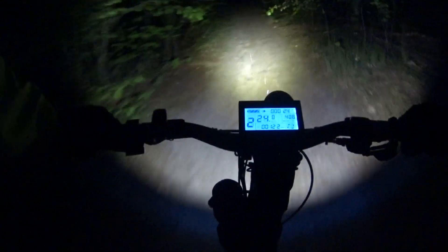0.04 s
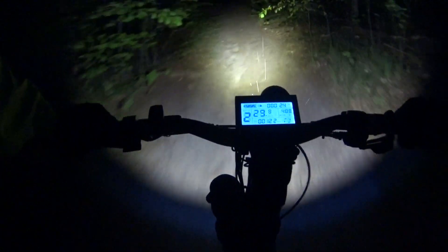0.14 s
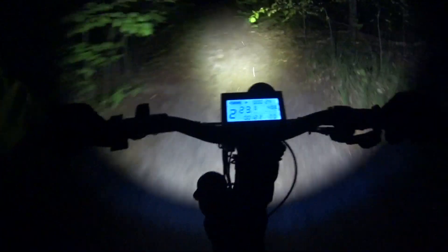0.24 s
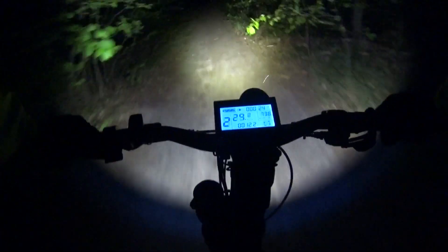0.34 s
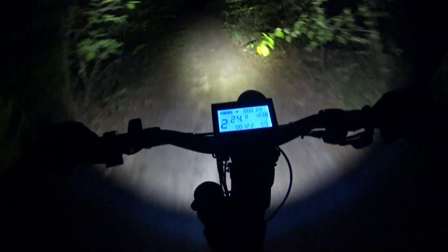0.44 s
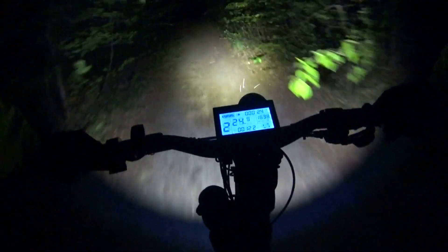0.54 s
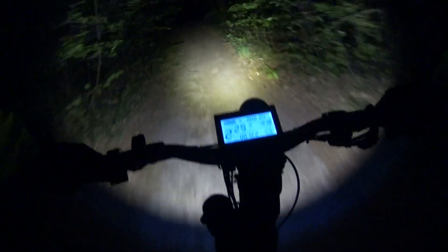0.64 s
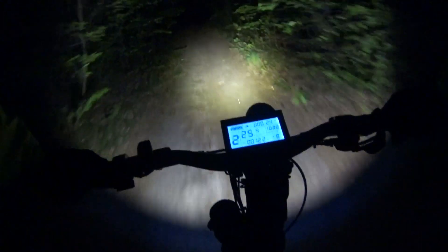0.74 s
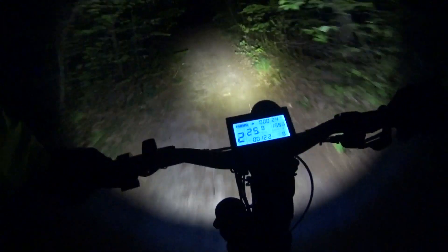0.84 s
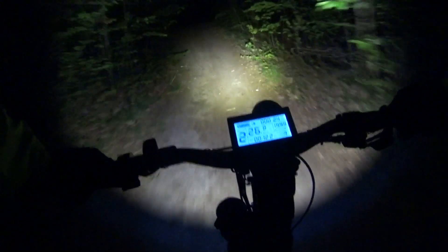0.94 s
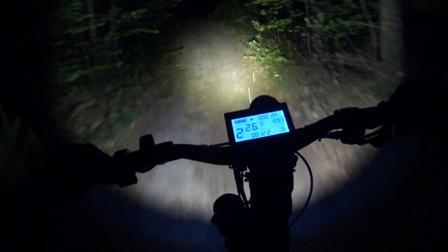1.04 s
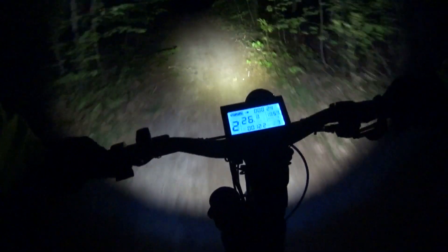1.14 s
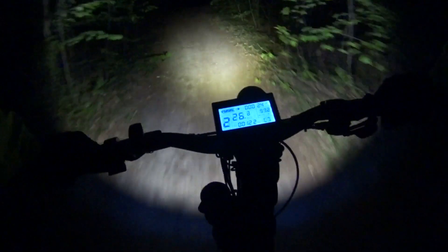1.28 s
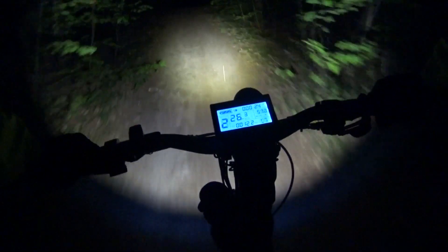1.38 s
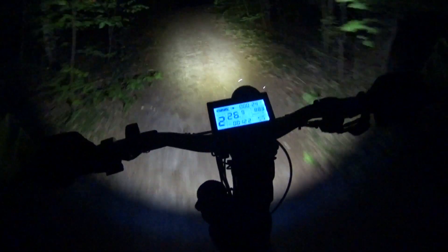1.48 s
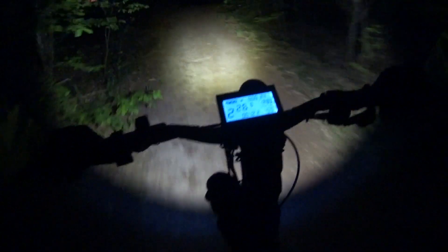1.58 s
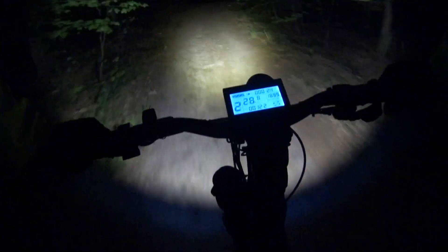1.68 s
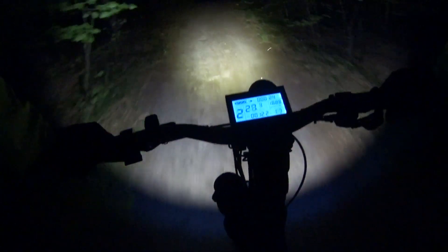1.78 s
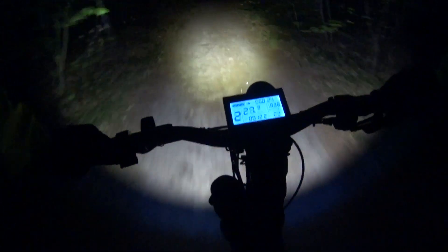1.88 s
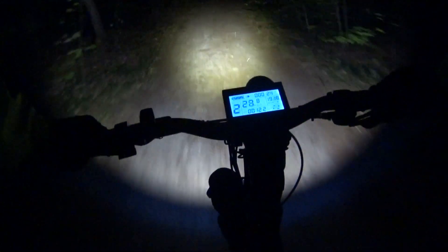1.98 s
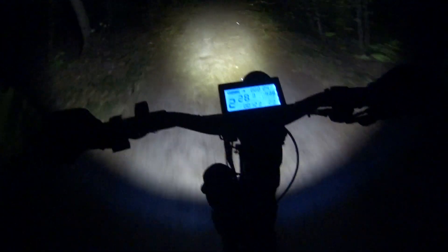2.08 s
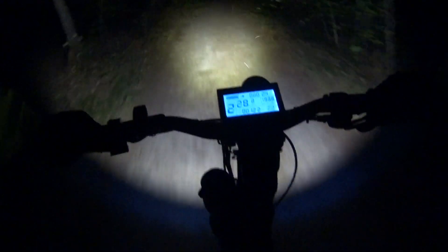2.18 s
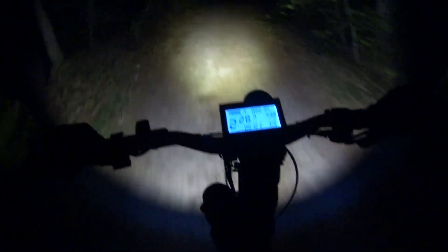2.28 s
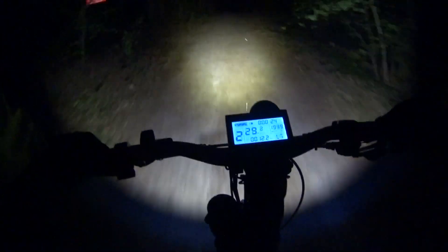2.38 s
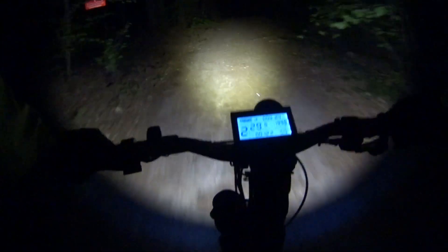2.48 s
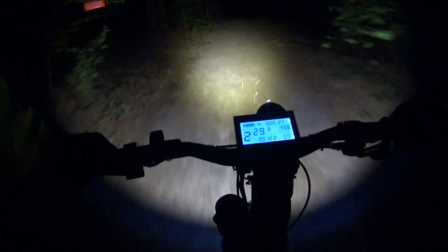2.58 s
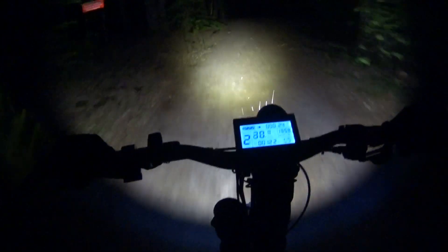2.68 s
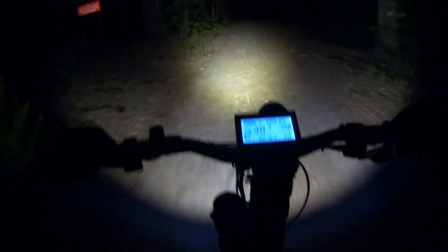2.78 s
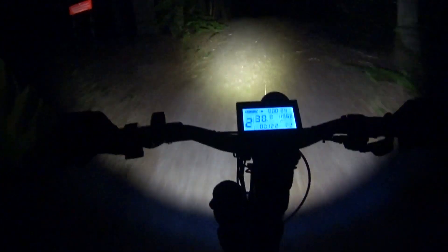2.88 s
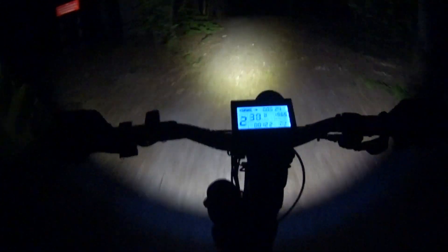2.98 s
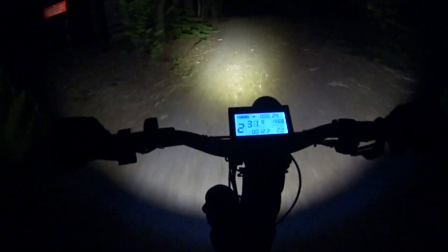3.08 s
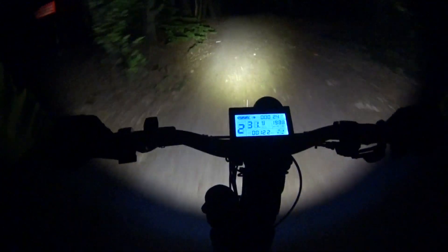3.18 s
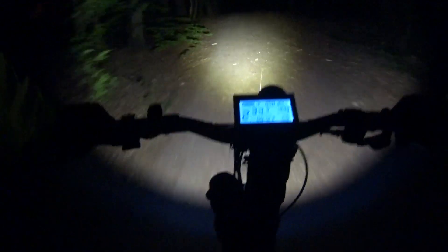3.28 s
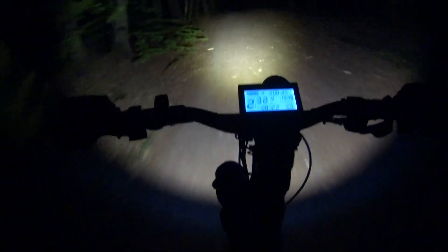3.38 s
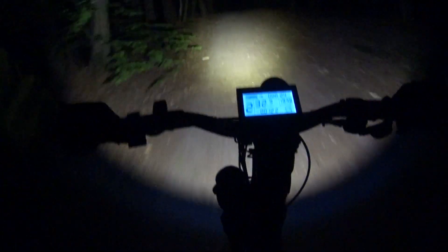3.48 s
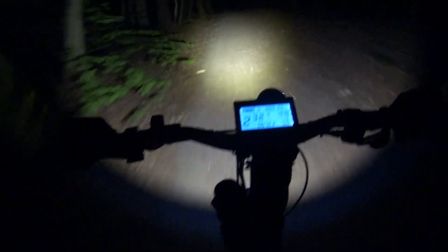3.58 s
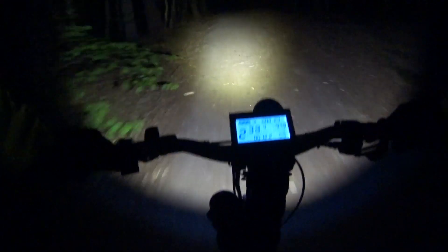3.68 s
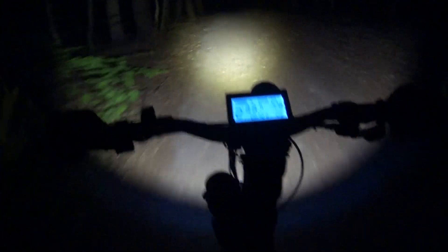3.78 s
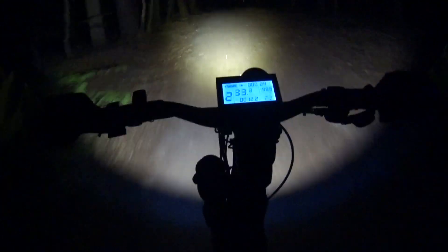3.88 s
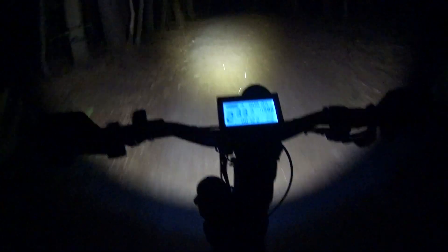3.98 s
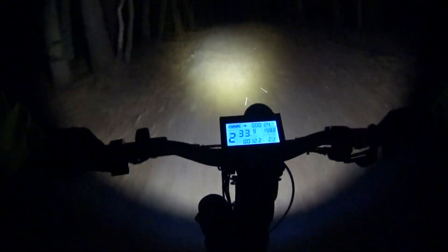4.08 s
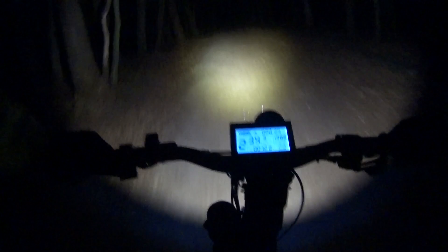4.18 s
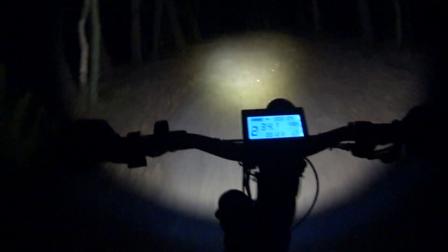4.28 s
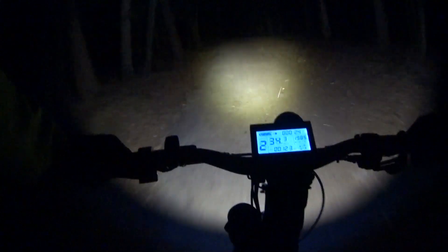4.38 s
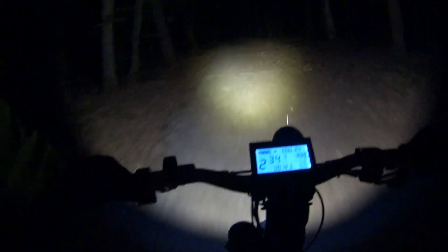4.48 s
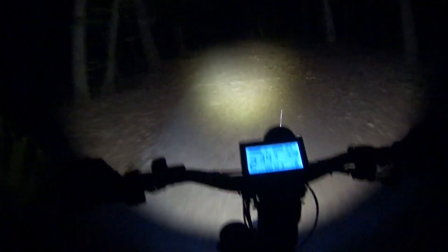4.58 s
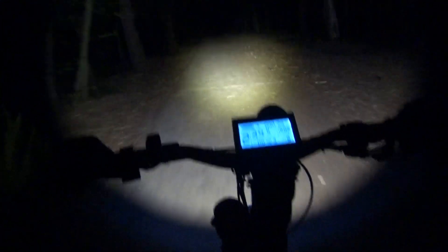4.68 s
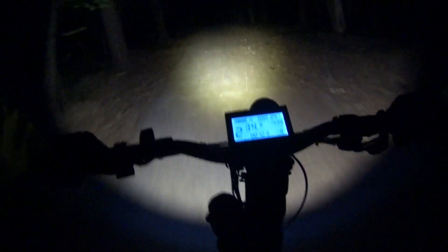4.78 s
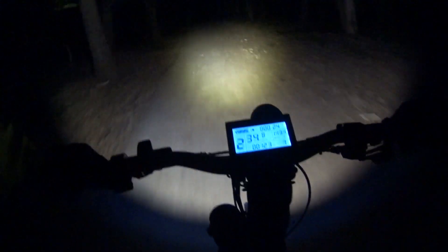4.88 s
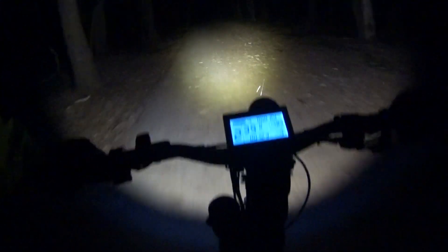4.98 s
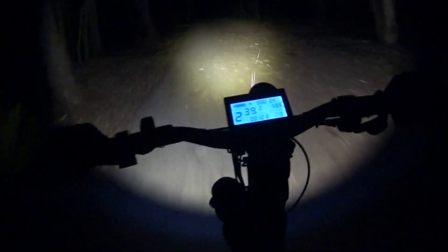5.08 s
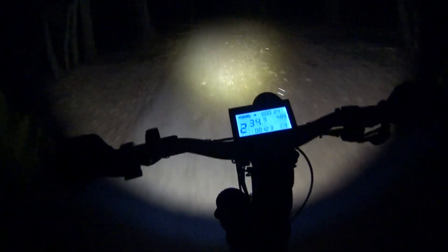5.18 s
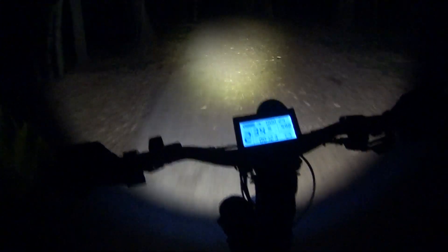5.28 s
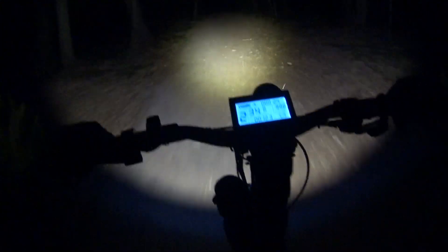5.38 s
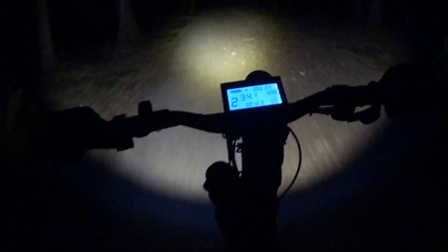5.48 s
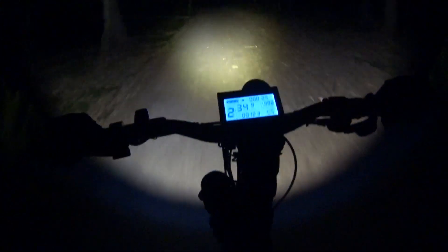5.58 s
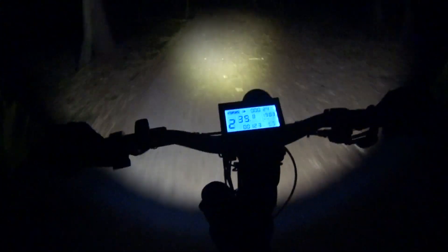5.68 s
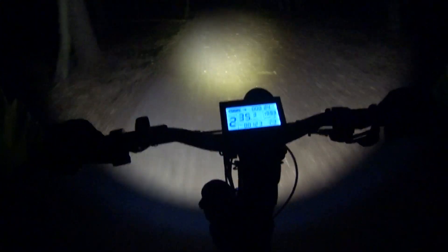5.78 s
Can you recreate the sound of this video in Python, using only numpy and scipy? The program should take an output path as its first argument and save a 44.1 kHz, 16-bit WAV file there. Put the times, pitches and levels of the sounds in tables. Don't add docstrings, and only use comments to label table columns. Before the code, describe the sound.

Continuous gritty tyre noise, midrange-heavy with little deep bass, grows in uneven surges as the bike gains speed. Brief sprays of litter hiss or roar through it. Short, dry stone knocks and brighter twig snaps break out irregularly, joined by tiny high metal pings and rattles. The close on-bike microphone gives a boxy, slightly resonant two-channel sound, dry and without audible forest echo.

```python
import sys
import numpy as np
from scipy import signal
from scipy.fft import rfft, irfft, next_fast_len
from scipy.io import wavfile
from scipy.ndimage import uniform_filter1d

SR = 44100
rng = np.random.default_rng(int(sys.argv[2]) if len(sys.argv) > 2 else 0)


def output_pcm(signal):
    pcm = np.clip(np.atleast_2d(signal).T, -1, 1) * 32767
    wavfile.write(sys.argv[1], SR, np.round(pcm).astype(np.int16))


def boost(x):
    u = np.asarray(x, float) / 20
    return 10 ** u


N = 257544

# start_s, load_db, coarseness_db
RIDE = [(0.0, -38, 2.5), (0.57, -37.5, 1), (0.78, -34.5, -0.5), (0.8, -36.5, -0.5), (1.9, -33, 0),
        (2.15, -27.5, 1.5), (2.65, -29, -0.5), (2.67, -27, 1), (2.7, -29, -2), (2.94, -25, 1.5),
        (3.55, -27.5, 0.5), (4.0, -23, 2), (4.21, -24.5, 0.5), (4.88, -22, 0.5), (4.93, -25, 3.5),
        (5.19, -24, -0.5), (5.32, -24.5, 0.5), (5.84, -23, 3.5)]
# centre_s, half_length_s, hiss_rise_db, roar_rise_db
SPRAYS = [(0.12, 0.025, -2, 9), (0.77, 0.022, 12, 1.5), (1.257, 0.041, 2.5, 5), (1.442, 0.021, 12, -7),
          (2.22, 0.067, 1.5, 3.5), (2.382, 0.035, 9.5, -2.5), (2.568, 0.0067, 1.5, 10),
          (2.67, 0.015, 14, 0), (3.486, 0.011, 3, 2.5), (4.224, 0.1, 4, 0.1), (4.43, 0.14, 2, -0.9),
          (4.85, 0.049, 6, 2.5), (5.204, 0.045, 5, 0), (5.467, 0.038, 5.5, 1), (1.115, 0.032, 7, 2),
          (2.294, 0.071, 4, 0), (3.59, .04, 6, 1), (3.991, 0.068, 2, 1), (5.68, 0.11, 4, 3),
          (5.342, 0.034, -2, -2), (1.637, .02, 3, 2.5), (2.723, .03, -2.5, -1.5)]
# start_s, peak_db, pitch_hz
KNOCKS = [(0.1017, -26, 2280), (0.501, -31.5, 1440), (0.7096, -24, 1480), (0.751, -21.5, 1900),
          (0.805, -27, 1460), (0.8976, -22, 1660), (0.989, -26, 2230), (1.1174, -21.5, 1700),
          (1.1444, -25.5, 1670), (1.4398, -20, 2300), (1.501, -30, 1650), (1.631, -22, 2420),
          (1.6829, -18, 1560), (1.8452, -20.5, 1450), (1.947, -12, 2400), (2.0024, -23, 1770),
          (2.427, -18, 1390), (2.5506, -13, 2200), (2.6642, -12.5, 1380), (3.146, -15, 2190),
          (3.242, -13, 1780), (3.3986, -12, 1730), (3.4248, -17.5, 2110), (3.5, -15, 1800),
          (4.1244, -11.5, 2380), (4.3385, -10.5, 2030), (5.127, -6.5, 2280), (5.2195, -11, 2140),
          (5.2493, -29, 1850), (5.6694, -10.5, 2520)]
# start_s, peak_db, pitch_hz, top_over_peak_db
TICKS = [(0.266, -36, 4470, -22), (0.765, -24, 4500, -26), (0.976, -24.5, 5000, -27),
         (1.119, -32, 4100, -24), (1.2155, -33, 4180, -28), (1.307, -38, 5170, -24), (1.44, -41, 4200, -24),
         (1.63, -30, 3600, -35), (1.666, -30, 4310, -19), (1.803, -31, 4220, -31),
         (1.867, -38.5, 4090, -11), (2.1823, -16, 4600, -21.5), (2.2214, -25.5, 4120, -28),
         (2.3406, -28, 3850, -27), (2.377, -17.5, 4500, -11.5), (2.619, -28.5, 4460, -20),
         (2.661, -30, 4600, -34), (3.0087, -20, 4200, -43), (3.1437, -28, 4300, -42),
         (2.397, -19.5, 5000, -26), (4.127, -23, 4200, -43), (4.187, -26.5, 4290, -22),
         (4.237, -16.5, 4500, -19), (4.3725, -23, 4300, -14), (4.655, -13.5, 4250, -30),
         (5.091, -27, 3760, -17), (5.149, -25.5, 4370, -33), (4.46, -31, 4380, -23),
         (5.465, -19, 3920, -25), (5.6745, -23, 4550, -41)]
# start_s, peak_db
PINGS = [
    (1.1273, -42),
    (1.4491, -41),
    (1.6776, -36),
    (2.3351, -31),
    (2.4159, -33),
    (2.5556, -34),
    (3.7499, -39),
    (5.467, -44),
    (5.5972, -37),
]
# start_s, length_s, level_db
CHATTER_SPELLS = [(1.445, .04, -58), (1.618, 0.02, -53), (1.668, .04, -52), (2.218, .01, -45),
                  (2.33, 0.031, -47), (2.392, 0.053, -50), (2.48, 0.011, -45), (2.548, .012, -63),
                  (2.613, 0.044, -51), (3.694, 0.017, -51), (4.273, .013, -46), (4.38, 0.053, -51),
                  (4.457, .016, -57), (4.482, .012, -54), (4.57, 0.018, -54), (4.74, .045, -59),
                  (4.84, .025, -64), (5.122, .025, -56), (5.23, .022, -56), (5.465, .04, -51)]
# freq_hz, density_db_per_hz
COLOUR = [(25, -15.5), (70, -21), (200, -17), (320, -14), (450, -17), (800, -7.5), (1400, 0), (2200, -3),
          (2600, 2.5), (3500, -12), (4300, -17.5), (5300, -24), (7200, -33), (11000, -46.5)]
# centre_hz, width_hz, gain_db
CASE_MODES = [(328, 100, 3.5), (501, 28, 4.5), (1390, 115, 3.5), (1675, 240, 6), (2200, 306, 10.5),
              (4300, 570, 4.5), (5860, 550, 2.5)]
# freq_hz, likeness_0_to_1, right_lead_rad, left_minus_right_db
PORTS = [(30, 0.88, 0.2, -0.3), (330, 0.91, 0.5, -1.7), (580, 0.57, 1.7, 0.0), (1400, 0.82, 1.2, 0.1),
         (1800, 0.63, 1.4, 2.1), (2100, 0.8, 2.1, 3.1), (2400, 0.28, 3.5, -0.0), (2700, 0.46, 4.6, -1.0),
         (3400, 0.17, 5.7, -3.8), (4200, 0.81, 6.5, -2.5), (5350, 0.23, 6.7, -1.6), (5900, 0.58, 6.6, -1.2),
         (6800, 0.31, 6.5, -1.1), (8500, 0.7, 6.3, -0.4)]

FFT_SIZE = next_fast_len(N + 8192)
GRID_HZ = np.maximum(np.fft.rfftfreq(FFT_SIZE, 1 / SR), 1)
FULL_LOAD_DB = -23


def rms_one(x):
    return x / np.sqrt(np.mean(x ** 2) + 1e-20)


def at_hz(points):
    hz, *columns = np.transpose(points)
    return [np.interp(np.log(GRID_HZ), np.log(hz), column) for column in columns]


def drift(rate_hz):
    pole = np.exp(-80 * np.pi * rate_hz / SR)
    noise = rng.standard_normal(N // 40 + 2002)
    slow = signal.lfilter([1], [1, -2 * pole, pole * pole], noise)[2000:]
    return np.interp(np.arange(N) / 40, np.arange(len(slow)), rms_one(slow))


def swell(level_db):
    return level_db - 10 * np.log10(np.mean(boost(2 * level_db)))


def causal(gain_db):
    cepstrum = irfft(gain_db * np.log(10) / 20, FFT_SIZE)
    cepstrum[1:FFT_SIZE // 2] *= 2
    cepstrum[FFT_SIZE // 2 + 1:] = 0
    return np.exp(rfft(cepstrum))


def to_ports(shared, own_left, own_right, least_likeness=0.):
    likeness, lead_rad, balance_db = at_hz(PORTS)
    lead_rad = np.where(GRID_HZ > 7000, 2 * np.pi, lead_rad)
    likeness = np.clip(likeness, least_likeness, 1)
    common, own = np.sqrt(likeness), np.sqrt(1 - likeness)
    left = common * shared * np.exp(-1j * lead_rad) + own * own_left
    right = common * shared + own * own_right
    return irfft([left * boost(balance_db / 2), right * boost(-balance_db / 2)], FFT_SIZE)[:, :N]


def ride():
    t_s = np.arange(N) / SR
    start_s, load_db, coarse_db = np.transpose(RIDE)
    spray_hiss_db, spray_roar_db = np.zeros(N), np.zeros(N)
    for centre_s, half_length_s, hiss_db, roar_db in SPRAYS:
        shape = np.clip(1 - np.abs(t_s - centre_s) / half_length_s, 0, 1)
        spray_hiss_db += hiss_db * shape
        spray_roar_db += roar_db * shape
    return np.interp(t_s, start_s, load_db), np.interp(t_s, start_s, coarse_db), spray_hiss_db, spray_roar_db


def tyres(grains_per_s, spread_db, bed_power, patchy_db, spill_bands):
    load, coarse, spray_hiss, spray_roar = ride()
    swells_db = np.array([
        swell(.56 * load),
        swell(load - .5 * coarse + spray_roar),
        swell(1.48 * load + .5 * coarse + .5 * spray_roar + .1 * spray_hiss),
        swell(.38 * load + .9 * coarse + spray_hiss)])
    bed = bed_power * boost(.35 * (load - FULL_LOAD_DB))

    sizes = boost(spread_db * np.minimum(rng.exponential(1, N), 3))
    sizes *= rng.random(N) < grains_per_s * boost(3 * drift(60)) / SR
    clicks = sizes * rng.standard_normal((3, N))

    centres_hz = np.array([40, 160, 400, 800, 1200, 1600, 2100, 2800, 3900, 5500, 7500, 10000])
    pitch_band = rng.uniform(2.26, len(centres_hz), N)
    together = drift(21)
    spectra = 0
    for k, hz in enumerate(centres_hz):
        grains = rms_one(clicks * np.exp(-((pitch_band - k) / spill_bands) ** 2))
        grit = np.interp(np.log(hz), np.log([600, 1300, 2800, 4500, 8000]), [.017, .2, .66, .16, .2])
        mix = np.array([np.interp(np.log(hz), np.log([450, 1400, 2500, 5000]), row) for row in np.eye(4)])
        level = boost(mix @ swells_db + patchy_db * (hz > 700) * (together + drift(5.9)))
        rush = np.sqrt(bed) * rng.standard_normal((3, N))
        drive = level * (rush + np.sqrt(grit) * grains) / np.sqrt(bed + grit)
        share = np.interp(np.log(GRID_HZ), np.log(centres_hz), np.arange(len(centres_hz)) == k)
        spectra = spectra + np.sqrt(share) * rfft(drive, FFT_SIZE)

    colour_db = at_hz(COLOUR)[0]
    for hz, width_hz, gain_db in CASE_MODES:
        colour_db = colour_db + gain_db / (1 + (2 * (GRID_HZ - hz) / width_hz) ** 2)
    return boost(-16) * to_ports(*(spectra * causal(colour_db)))


def ring(clicks, hz, t60_s):
    pole, turn_rad = boost(-60 / (t60_s * SR)), 2 * np.pi * hz / SR
    return signal.lfilter([0, np.sin(turn_rad)], [1, -2 * pole * np.cos(turn_rad), pole * pole], clicks + 1e-18)


def band(x, low_hz, high_hz):
    return signal.sosfilt(signal.butter(2, [low_hz, high_hz], "band", fs=SR, output="sos"), x)


def bursts(start_s, decay_ms, chatter_db):
    t_s = np.arange(1300) / SR
    rows = rng.standard_normal((len(start_s), len(t_s))) * np.exp(-t_s / (decay_ms / 1000))
    rows *= boost(chatter_db)
    rows[:, 0] = 1
    return rows, np.round(np.asarray(start_s) * SR).astype(int)


def laid_out(rows, starts, peak_db):
    out = np.zeros(N + rows.shape[1])
    for row, start, db in zip(rows, starts, peak_db):
        out[start:start + len(row)] += boost(db) * row / np.abs(row).max()
    return out[:N]


def contact_to_ports(x):
    smear = rng.standard_normal((2, 200)) * np.exp(-np.arange(200) / 35)
    smear /= np.sqrt(np.sum(smear ** 2, axis=1, keepdims=True))
    shared = rfft(x, FFT_SIZE)
    own_left, own_right = shared * rfft(smear, FFT_SIZE)
    return to_ports(shared, own_left, own_right, least_likeness=.85)


def pebbles(count):
    when, which, detune, size = rng.random((count, 4)).T
    start_s = (np.arange(count) + when) / count * (N / SR - .05)
    pitch_hz = np.array(CASE_MODES)[2 + (3 * which).astype(int), 0] * (.97 + .1 * detune)
    load_db = np.interp(start_s, *np.transpose(RIDE)[:2])
    over_load_db = 4 + 1.5 * (4 * size - 2)
    peak_db = FULL_LOAD_DB + .9 * (load_db - FULL_LOAD_DB) + over_load_db
    return list(zip(start_s, peak_db, pitch_hz))


def stones():
    start_s, peak_db, pitch_hz = np.transpose(list(KNOCKS) + pebbles(count=150))
    rows, starts = bursts(start_s, decay_ms=1.5, chatter_db=-22)
    ringing = np.array([ring(row, hz, t60_s=.008) for row, hz in zip(rows, pitch_hz)])
    knock = band(band(ringing + 5 * rows, 1200, 2900), 900, 3800)
    return laid_out(knock, starts, peak_db + 4)


def twigs():
    start_s, peak_db, pitch_hz, top_db = np.transpose(TICKS)
    rows, starts = bursts(start_s, decay_ms=1.6, chatter_db=-11)
    ringing = np.array([ring(row, hz, t60_s=.003) for row, hz in zip(rows, pitch_hz)])
    snap = band(band(ringing + 3 * rows, 2800, 6500), 2300, 7500)
    top = boost(top_db + 13)[:, None] * band(rows, 6500, 11000)
    return laid_out(snap + top, starts, peak_db)


def metal_pings(hz, t60_s, trim_db):
    clicks = np.zeros(N)
    for start_s, peak_db in PINGS:
        clicks[round(start_s * SR)] = boost(peak_db + trim_db)
    return band(ring(clicks, hz, t60_s), 5800, 7200)


def metal_rattle(touches_per_s, hz, t60_s, edge_s):
    t_s, shake = np.arange(N) / SR, np.zeros(N)
    for start_s, length_s, level_db in CHATTER_SPELLS:
        inside_s = np.minimum(t_s - start_s, start_s + length_s - t_s)
        shake += boost(level_db) * np.clip(inside_s / edge_s + .5, 0, 1)
    touches = rng.standard_normal(N) * (rng.random(N) < touches_per_s / SR)
    mode = ring(touches, hz, t60_s) + .5 * ring(touches, hz * 1.01, t60_s / 3)
    height = uniform_filter1d(np.abs(mode), size=1200)
    return boost(-4) * uniform_filter1d(shake, size=150) * mode / height


def scene():
    rolling = tyres(grains_per_s=1300, spread_db=3, bed_power=.91, patchy_db=.62, spill_bands=1.91)
    contacts = contact_to_ports(stones() + twigs())
    metal = metal_pings(hz=6470, t60_s=.016, trim_db=-1)
    metal = metal + metal_rattle(touches_per_s=600, hz=7680, t60_s=.08, edge_s=.0049)
    return rolling + contacts + metal * boost([[-.3], [.3]])


def top_cut(x):
    return signal.sosfilt(signal.butter(12, 12330, fs=SR, output="sos"), x)


def record(dry):
    rounded = 1.2 * np.tanh(dry / 1.2)
    low_pass = signal.cheby2(16, 40, 11000 * 1.035, fs=SR, output="sos")
    finished = signal.sosfilt(low_pass, rounded)
    return top_cut(finished)


dry = scene()
out = record(dry)
output_pcm(out)
```